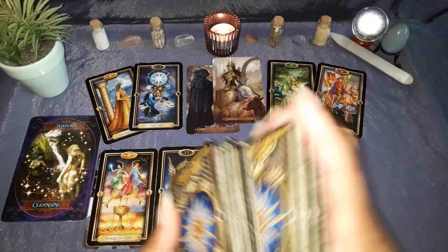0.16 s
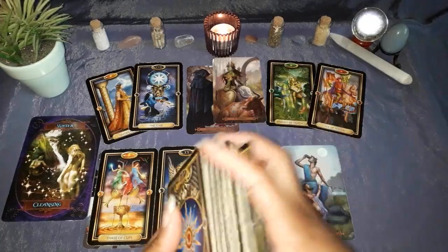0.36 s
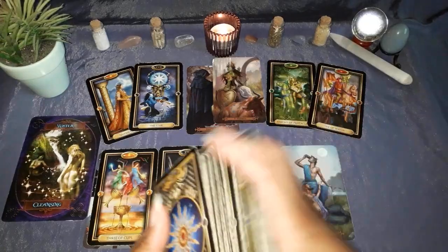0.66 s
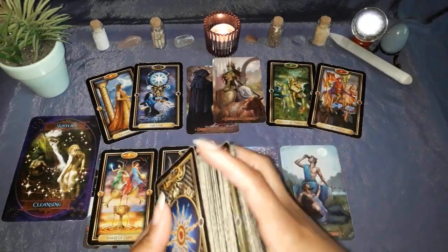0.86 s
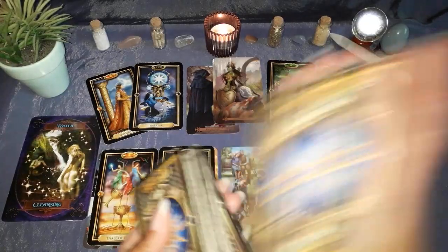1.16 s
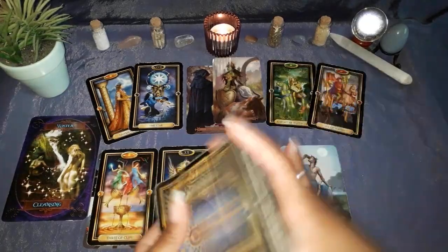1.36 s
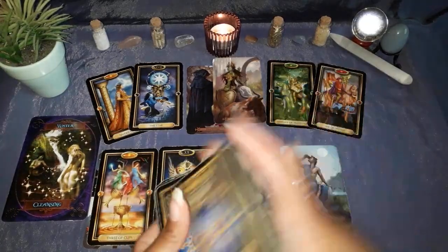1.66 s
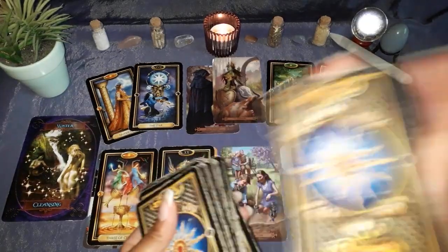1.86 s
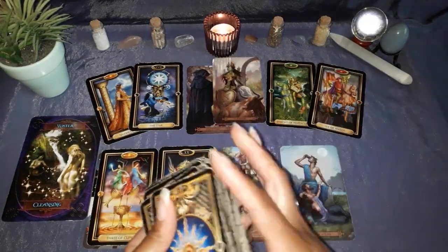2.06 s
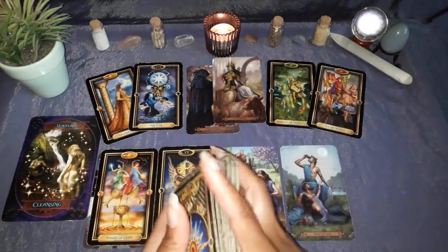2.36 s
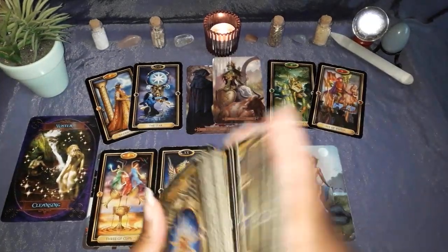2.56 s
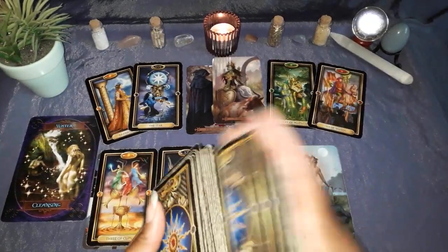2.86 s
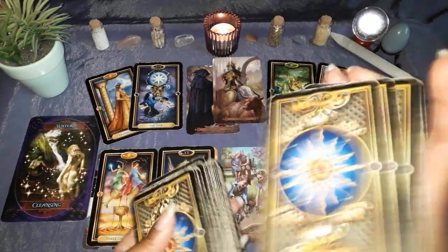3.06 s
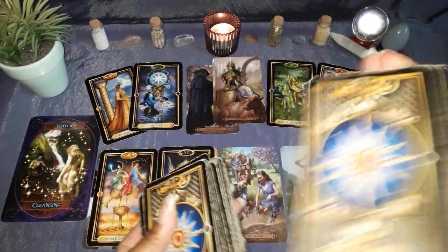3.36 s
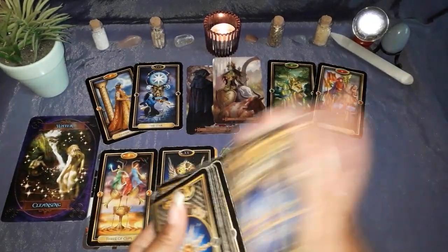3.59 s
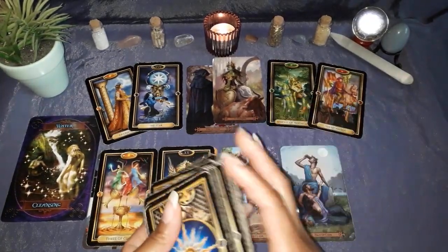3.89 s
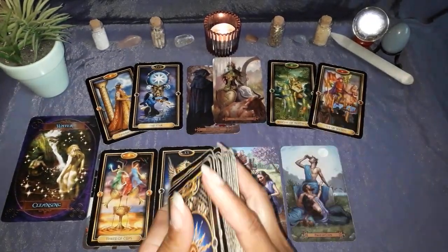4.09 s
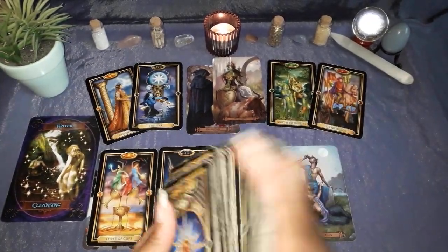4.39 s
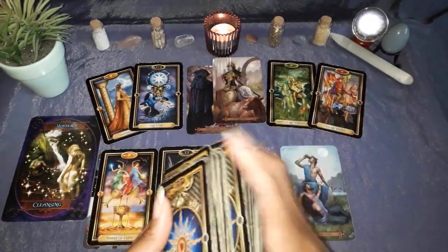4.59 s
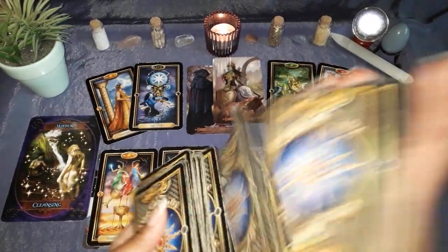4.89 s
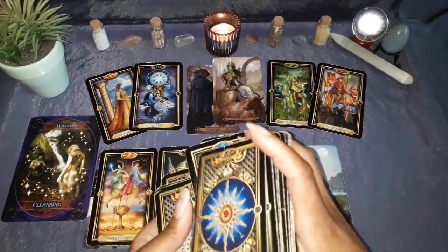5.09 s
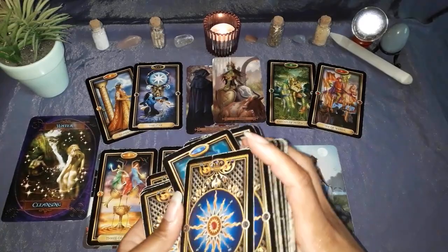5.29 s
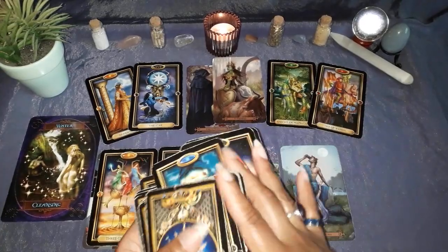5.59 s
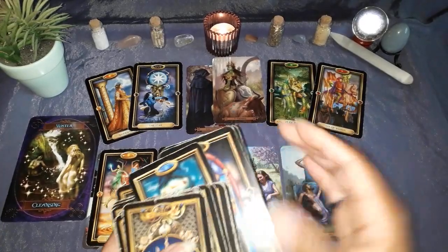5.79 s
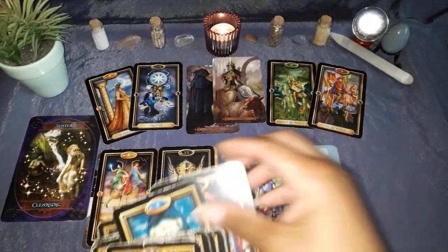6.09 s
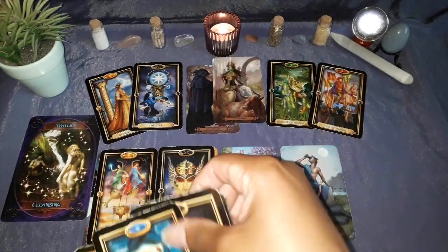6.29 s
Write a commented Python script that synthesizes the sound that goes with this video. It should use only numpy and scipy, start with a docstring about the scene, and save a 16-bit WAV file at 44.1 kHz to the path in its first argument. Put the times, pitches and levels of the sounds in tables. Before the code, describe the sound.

Large, stiff cards are shuffled by hand in a small room, with soft swishes, light taps and a few sharp slaps.

```python
"""Soft swishes and taps, then sharp slaps: large, stiff cards are shuffled overhand in a small room.
Each dropped packet touches with an edge, slaps flat, skids along the deck and knocks to a stop.
Impacts give a thud, a crack and the brief ring of bending cards; sliding friction rasps and hisses.
Behind the cards lie a dull room noise and a distant low drone that swells and fades."""
import sys
import numpy as np
from scipy import signal
from scipy.fft import rfft, irfft
from scipy.io import wavfile
from scipy.ndimage import uniform_filter1d

SR = 44100
rng = np.random.default_rng(int(sys.argv[2]) if len(sys.argv) > 2 else 0)


def store_wav(level_fs):
    """Save 16-bit WAV to argv[1]."""
    pcm = np.round(np.clip(np.atleast_2d(level_fs), -1, 1) * 32767)
    wavfile.write(sys.argv[1], SR, pcm.T.astype(np.int16))


N = 284133

# packets landing on the deck: (time [s], delay until flat [s], delay until stopped [s], edge [dB],
# slap [dB], skid [dB], stop [dB], thud [dB], crack over ring [dB], ring pitch [Hz], skid hiss centre [Hz])
LANDINGS = [(1.1356, 0.0092, .034, -45, -33, -50, -54, -30, 2.5, 1520, 5200),
            (1.3171, 0.0043, 0.037, -32.5, -29.5, -36.5, -34, -30, -10, 1710, 8000),
            (1.626, 0.0068, 0.032, -37.5, -27, -43.5, -37, -30.5, -6, 1704, 7200),
            (1.932, .0023, 0.029, -25.5, -26.5, -35, -33, -32.5, -3.5, 1940, 6200),
            (2.9833, .0131, 0.037, -41, -32.5, -56.5, -46, -33.5, -5.5, 1720, 7480),
            (3.156, .01, .0433, -32, -32.5, -39, -29, -30.5, -2.5, 1742, 7200),
            (3.473, 0.0034, .0405, -39, -35.5, -45.5, -33.5, -32, 2, 2246, 7700),
            (5.0113, 0.0055, .0425, -23.5, -19.5, -36.5, -33, -31.5, -3, 1805, 5500)]


def knocks(impacts, crack_s=0.0014, thud_s=0.0024, stagger_s=0.0018, detune=0.014):
    """Impact excitation: a contact thuds, cracks and rings the damped bending modes; gives blows, rings."""
    # bending modes of the held cards: (frequency [multiple of ring pitch], level [dB], t60 [s])
    card_modes = [(.76, -13, 0.0053), (0.891, -2, 0.013), (0.998, 4.5, 0.015), (1.13, -1, 0.0101),
                  (1.3, -21.5, 0.0075), (2.2, -12.5, .004)]
    # spectrum of a packet's thud: (frequency [Hz], gain [dB])
    thud_shape = [(30, -44), (70, -29), (150, -6), (270, -5), (400, -3), (540, 1), (780, -1), (1100, -10.5),
                  (2000, -16), (5000, -28)]
    # spectrum of an edge's crack: (frequency [multiple of centre], gain [dB])
    crack_shape = [(.2, -36), (.5, -23.5), (.7, 4.5), (1.0, -3.5), (1.252, -1.5), (1.9, -2), (2.6, -14.5),
                   (4.0, -29)]
    ordinary_hz, snap_hz, snap_db = 4580, 11100, -24  # crack centres; level of the hardest snap
    blows, rings, t = np.zeros(N), np.zeros(N), np.arange(SR // 16) / SR
    impulse = t == 0
    radiation = signal.butter(2, 1000, "high", fs=SR, output="sos")  # a thin card hardly radiates bass
    for s, ring_db, thud_db, crack_db, pitch_hz in impacts:
        strike_noise, thud_noise, crack_noise = rng.standard_normal((3, len(t)))
        # the leading edge strikes first, the other cards land just after it
        strike = impulse + 0.2 * strike_noise * np.exp(-t / stagger_s)
        modes = np.zeros(len(t))
        for ratio, db, t60 in card_modes:
            hz = pitch_hz * ratio * (1 + detune * rng.standard_normal())
            modes += undb(db) * decay(t, t60) * np.sin(2 * np.pi * hz * t)
        bending = signal.fftconvolve(strike, modes)[:len(t)]
        add(rings, s, blow(signal.sosfilt(radiation, bending), ring_db))
        force = impulse + 0.17 * thud_noise * np.exp(-t / thud_s)
        add(blows, s, blow(colour(force, thud_shape), thud_db))
        # a harder contact is both shorter and brighter
        crack_hz = np.interp(undb(crack_db - snap_db) ** 6, [0, 1], [ordinary_hz, snap_hz])
        contact = crack_noise * np.exp(-t / crack_s * crack_hz / ordinary_hz)
        add(blows, s, blow(colour(contact, crack_shape, crack_hz), crack_db))
    return blows, rings


def landings():
    """A packet loses its momentum in three impacts: the edge touches, the face slaps, the skid stops."""
    impacts = []
    for s, flat_s, stop_s, edge, slap, _, stop, thud, crack, pitch_hz, _ in LANDINGS:
        impacts += [(s, edge, thud - 5, edge + crack, pitch_hz),
                    (s + flat_s, slap, thud, slap + crack, pitch_hz),
                    (s + stop_s, stop, stop - 7.5, stop - 3.5, pitch_hz)]
    return impacts


def taps():
    """Single impacts: one card at a time strikes the deck."""
    # card taps: (time [s], ring [dB], thud [dB], crack [dB], ring pitch [Hz])
    impacts = [(0.4212, -56.5, -54, -56, 1360), (0.5375, -55, -58, -69, 1097),
               (1.1141, -41.5, -62.5, -56.5, 1735), (1.4144, -38.5, -41, -56, 1260),
               (1.4307, -39, -54, -40.5, 1980), (1.4374, -38.5, -40, -41, 1620),
               (1.7312, -56, -47, -51, 1950), (1.743, -30, -41.5, -50, 2374),
               (2.2996, -53.5, -68.5, -54.5, 2030), (2.646, -61, -64, -51, 2190),
               (2.693, -52, -52, -46.5, 1890), (2.8805, -53, -58, -59, 1900),
               (3.283, -51, -60, -41.5, 2240), (3.2996, -55, -39.5, -58, 1456),
               (3.55, -33.5, -41.5, -44, 1994), (3.5774, -51, -42.5, -42, 1940),
               (3.6035, -42.5, -41.5, -58, 3260), (3.7479, -39.5, -45.5, -58, 2170),
               (3.8103, -49, -50, -50.5, 2010), (4.026, -47, -70, -50, 2590),
               (4.5383, -57, -52, -57.5, 1964), (4.9644, -47.5, -52, -54.5, 1501),
               (4.9845, -47, -52.5, -48, 1720), (5.023, -31, -32, -42.5, 1778),
               (5.4079, -48, -58.5, -64, 2040), (5.4247, -46, -54, -68, 2510), (5.49, -44, -51, -57, 2340),
               (5.4976, -38.5, -58, -63, 1603), (5.5532, -53, -52.5, -66, 1640),
               (5.5985, -50, -67, -53, 2140), (5.6081, -48.5, -62, -54, 2060),
               (6.1563, -58, -46, -67, 1648), (6.1879, -39.5, -47.5, -56, 1810)]
    return impacts


def ticks(rasp_gain, count=55, pitch_hz=2100, pitch_spread=0.23, spread_db=6, firmest_db=-53):
    """Random impacts: stray edges catch more often and more loudly where the cards rub harder."""
    impacts, grip = [], np.minimum(rasp_gain, undb(firmest_db))
    moments = np.searchsorted(np.cumsum(grip) / np.sum(grip), rng.random(count))
    for i, (strength, pitch) in zip(moments, rng.standard_normal((count, 2))):
        ring_db = 20 * np.log10(grip[i]) - 1 + spread_db * strength
        impacts.append((i / SR, ring_db, ring_db - 8, ring_db - 2.5, pitch_hz * np.exp(pitch_spread * pitch)))
    return impacts


def friction(catch_db=2.0, grain_db=2.5, rub_rasp_db=-69.5, rub_hiss_db=-70, rub_hz=8000):
    """Sliding friction follows pressure: tiny catches rasp, faces hiss; gives the sound and rasp gain."""
    # spectrum of the rasp: (frequency [Hz], gain [dB])
    rasp_shape = [(50, -20), (140, 0.5), (300, -6.5), (600, -8), (1050, -5), (1750, 1), (2250, 0),
                  (3100, -3), (4300, -13), (6000, -21), (12000, -25)]
    # spectrum of a face's hiss: (frequency [multiple of centre], gain [dB])
    hiss_shape = [(.12, -33), (.35, -11), (0.562, -0.5), (0.748, -1.5), (0.998, -0.5), (1.35, -3),
                  (1.7, -10.5), (2.2, -13.5), (4.0, -22)]
    t = np.arange(N) / SR
    grip = undb(catch_db * walk(170) + grain_db * walk(2500))
    catches, faces = grip * rng.standard_normal((2, N))
    # cards in moving hands always rub lightly; the level dips where the hands pause
    rub = undb(walk(15) - 13 * swell(centre_s=5.82, half_s=0.1766))
    rasp_gain = undb(rub_rasp_db) * rub
    hiss = undb(rub_hiss_db) * rub * unit(colour(grip * rng.standard_normal(N), hiss_shape, rub_hz))
    for corner_s, corner_db, rasp_db, hiss_db, centre_hz in pushes():
        on = slice(*np.searchsorted(t, [corner_s[0], corner_s[-1]]))
        pressure = undb(np.interp(t[on], corner_s, corner_db))
        rasp_gain[on] = np.hypot(rasp_gain[on], pressure * undb(rasp_db))
        hiss[on] += pressure * undb(hiss_db) * unit(colour(faces[on], hiss_shape, centre_hz))
    return rasp_gain * unit(colour(catches, rasp_shape)) + hiss, rasp_gain


def pushes(faint_db=-30, light_db=-13, linger_s=0.096, skid_attack_s=.002, skid_release_s=.045):
    """Contact pressure envelopes: a stroke swells and eases, a skid holds until the packet stops."""
    # strokes of sliding cards: (firmest time [s], swell [s], rasp [dB], hiss [dB], hiss centre [Hz])
    strokes = [(.035, .15, -55, -50, 3600), (.27, 0.034, -43.5, -42.5, 7620), (.487, 0.019, -58, -56, 7220),
               (0.687, 0.028, -62.5, -54.5, 8000), (0.821, 0.033, -46.5, -46.5, 7440),
               (.92, 0.032, -58, -58, 8800), (1.02, 0.049, -55.5, -57.5, 8600),
               (1.124, 0.051, -45, -45, 7530), (1.422, .045, -47, -43, 7700),
               (1.7, 0.046, -59.5, -54, 7640), (2.121, 0.012, -57.5, -49, 6840),
               (2.17, 0.28, -58, -61.5, 7010), (2.55, 0.14, -67, -64, 8000),
               (2.651, 0.0285, -60.5, -53.5, 4680), (2.871, 0.074, -64, -60, 7500),
               (2.986, 0.029, -50.5, -45.5, 7700), (3.278, 0.018, -44, -42, 7090),
               (3.575, .035, -45.5, -48, 6840), (3.786, .04, -50, -47.5, 8340),
               (4.011, 0.091, -53.5, -53.5, 8900), (4.425, 0.1, -66.5, -57, 8300),
               (4.595, 0.086, -57.5, -59, 8600), (4.733, 0.021, -51.5, -53.5, 7800),
               (4.855, 0.04, -50, -44, 7360), (5.437, .038, -44, -56.5, 4200),
               (5.486, 0.063, -47.5, -54.5, 4740), (5.61, 0.046, -52, -53, 4236),
               (6.05, 0.26, -71.5, -61, 5160), (6.318, 0.2, -58.5, -55, 5100)]
    envelopes = []
    for s, swell_s, rasp_db, hiss_db, centre_hz in strokes:
        eased_s = s + 0.64 * swell_s
        corner_s = [s - 2 * swell_s, s - swell_s, s, eased_s, eased_s + linger_s]
        envelopes.append((corner_s, [faint_db, light_db, 0, light_db, -36], rasp_db, hiss_db, centre_hz))
    for s, _, stop_s, _, _, skid_db, *_, centre_hz in LANDINGS:
        corner_s = [s, s + skid_attack_s, s + stop_s, s + stop_s + skid_release_s]
        envelopes.append((corner_s, [faint_db, 0, -2, faint_db], skid_db - 3, skid_db, centre_hz))
    return envelopes


def ping(start_s=1.743, hz=2536, db=-40, t60_s=0.14):
    """Free vibration: one lightly damped mode lingers after one of the taps."""
    out, t = np.zeros(N), np.arange(SR // 4) / SR
    add(out, start_s, blow(np.sin(2 * np.pi * hz * t) * decay(t, t60_s), db))
    return out


def palm(decay_s=0.0016):
    """Heavy damping: soft flesh gives only a cycle or two of bass."""
    # the deck bumping the palm: (time [s], pitch [Hz], level [dB])
    bumps = [(1.079, 138.3, -40.5)]
    out, t = np.zeros(N), np.arange(SR // 16) / SR
    for s, pitch_hz, db in bumps:
        add(out, s, blow(np.sin(2 * np.pi * pitch_hz * t) * t * np.exp(-t / decay_s), db))
    return out


def room(x, first_s=0.0045, build_s=0.0028, stretches=22):
    """Reverberation: table and walls reflect; the hands move, so each stretch has its own echoes."""
    # reverberation bands: (low edge [Hz], high edge [Hz], t60 [s], level [dB])
    bands = [(90, 440, 0.267, -10), (510, 1540, 0.22, -6.5), (1260, 3500, 0.23, -13.5),
             (3000, 8200, 0.3, -9), (8000, 18000, 0.16, -14)]
    out, t = np.zeros(N), np.arange(SR // 2) / SR
    responses = np.zeros((stretches, len(t)))
    for low_hz, high_hz, t60, db in bands:
        band = signal.butter(2, [low_hz, high_hz], "band", fs=SR, output="sos")
        tail = np.clip((t - first_s) / build_s, 0, 1) * decay(t, t60)
        echoes = rng.standard_normal(responses.shape) * tail / np.sqrt(np.sum(tail ** 2))
        responses += undb(db) * signal.sosfilt(band, echoes)
    for stretch, response in zip(np.array_split(np.arange(N), stretches), responses):
        add(out, stretch[0] / SR, signal.fftconvolve(x[stretch], response))
    return out


def background(air_db=-69, pitch_waver=.016):
    """Superposition of dull room noise, a wavering low drone and a thin, even hiss."""
    # course of the dull noise: (time [s], level [dB])
    dull_levels = [(0.0, -59), (0.77, -61), (1.02, -59.5), (2.58, -53), (3.37, -53), (5.13, -60),
                   (6.44, -62.5)]
    # spectrum of the dull noise: (frequency [Hz], gain [dB])
    dull_shape = [(20, -21), (45, -2), (65, 2), (100, 2.5), (180, 0.5), (270, -5), (420, -7), (560, -5),
                  (700, -1.5), (870, -0.5), (1050, -10.5), (1350, -18), (3000, -44.5)]
    # swells of the distant drone: (loudest time [s], half length [s], pitch [Hz], level [dB])
    drone_swells = [(1.967, 0.2, 72.4, -56.5), (2.998, 0.62, 73.5, -66), (3.86, 0.1, 62.3, -59),
                    (5.2, 1.3, 61.9, -72.5)]
    # spectrum of the thin hiss: (frequency [Hz], gain [dB])
    air_shape = [(200, 1.5), (1500, -25.5), (3000, 1), (6000, 1), (12000, -8), (16000, -4.5)]
    dull_db = np.interp(np.arange(N) / SR, *np.transpose(dull_levels)) - 0.5
    dull = unit(colour(rng.standard_normal(N), dull_shape)) * undb(dull_db + 0.88 * walk(8))
    phase_per_hz = 2 * np.pi * np.cumsum(1 + pitch_waver * walk(10)) / SR
    drone = sum(undb(db) * swell(s, half_s) * unit(np.sin(hz * phase_per_hz))
                for s, half_s, hz, db in drone_swells)
    drone *= undb(walk(3.2))
    air = undb(air_db) * unit(colour(rng.standard_normal(N), air_shape))
    return dull + drone + air


def undb(db):
    """Decibels to amplitude gain."""
    return 10 ** (np.asarray(db) / 20)


def unit(x):
    """Normalisation to rms 1."""
    return x / np.sqrt(np.mean(x ** 2))


def decay(t, t60):
    """Exponential damping: 60 dB down after t60 seconds."""
    return np.exp(-np.log(1000) * t / t60)


def swell(centre_s, half_s):
    """Gaussian rise and fall around a moment."""
    return np.exp(-((np.arange(N) / SR - centre_s) / half_s) ** 2)


def walk(rate_hz):
    """Smooth random modulation with rms 1."""
    step = max(int(SR / rate_hz), 2)
    held = np.repeat(rng.standard_normal(N // step + 1), step)
    return unit(uniform_filter1d(held, step)[:N])


def colour(x, shape, scale=1, size=4096):
    """Minimum-phase filter through (frequency, gain [dB]) points; frequency times scale is in Hz."""
    frequency, db = np.transpose(shape)
    bin_hz = np.arange(size // 2 + 1) * SR / size
    gain = undb(np.interp(np.log(bin_hz + 1), np.log(frequency * scale), db))
    cepstrum = irfft(np.log(gain))
    cepstrum[1:size // 2] *= 2  # folding the cepstrum makes the filter causal
    cepstrum[size // 2 + 1:] = 0
    return signal.fftconvolve(x, irfft(np.exp(rfft(cepstrum))))[:len(x)]


def blow(x, db, contact_s=.005):
    """Energy normalisation: x gets the energy of level db held for one contact."""
    return x * undb(db) * np.sqrt(contact_s * SR / np.sum(x ** 2))


def add(out, s, x):
    """Superpose x on out from time s on."""
    i = max(int(s * SR), 0)
    out[i:i + len(x)] += x[:max(N - i, 0)]


def scene(ring_send_db=-1.5):
    """Superposition of cards, room and background: nearly mono, with a very faint stereo width."""
    # spectrum of the faint stereo width: (frequency [Hz], gain [dB])
    width = [(30, -17), (120, -25.5), (500, -25.5), (1000, -39), (2000, -26.5), (4000, -14.5),
             (8000, -10.5), (13000, -4)]
    sliding, rasp_gain = friction()
    blows, rings = knocks(landings() + taps() + ticks(rasp_gain))
    contacts = blows + sliding + palm()
    # bending cards are loud close by but send less into the room
    reverberation = room(contacts + undb(ring_send_db) * rings)
    centre = contacts + rings + ping() + reverberation + background()
    side = colour(room(centre), width)
    return np.array([centre + side, centre - side])


def record(dry, top_hz=16100):
    """Frequency response: a nearby phone's microphone colours the sound and a low-pass cuts the top."""
    # response of the microphone: (frequency [Hz], gain [dB])
    microphone = [(20, -3), (40, -5.5), (65, 0.5), (2400, 0.5), (3050, -5.5), (4200, 2.5), (6000, -3.5),
                  (8200, -0.5), (13000, 3), (16000, -5)]
    heard = np.array([colour(channel, microphone) for channel in dry])
    return signal.sosfilt(signal.ellip(10, .1, 80, top_hz, fs=SR, output="sos"), heard)


dry = scene()
out = record(dry)
store_wav(out)
```